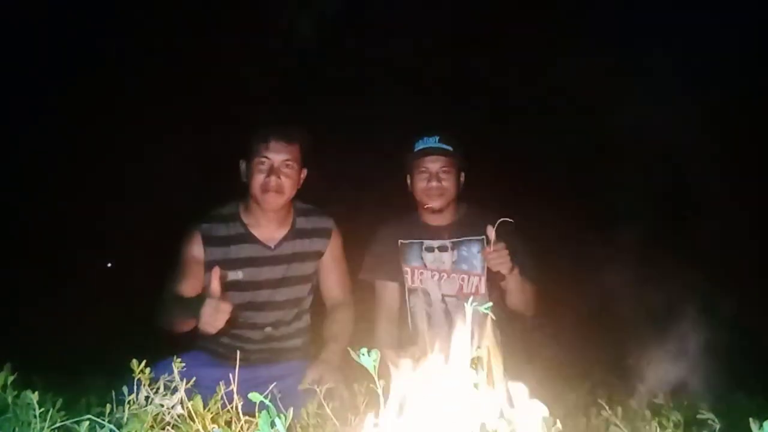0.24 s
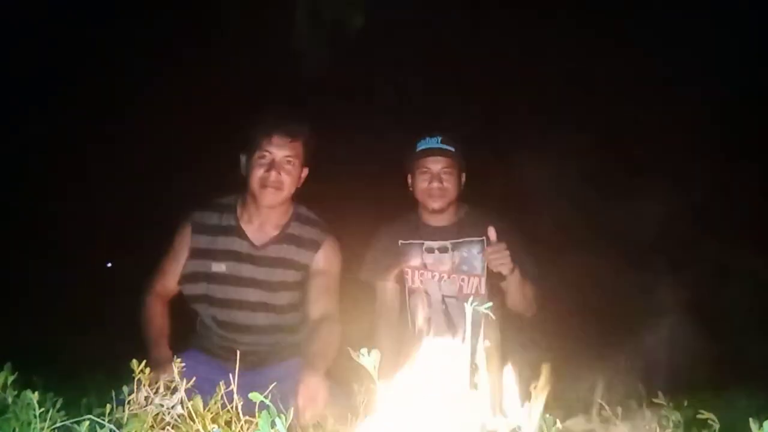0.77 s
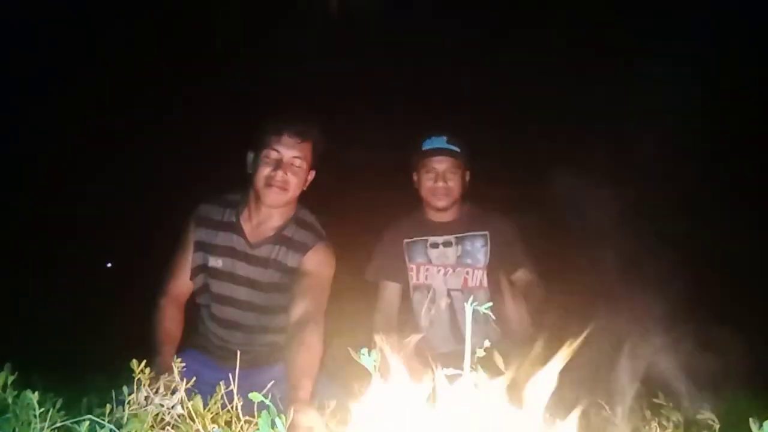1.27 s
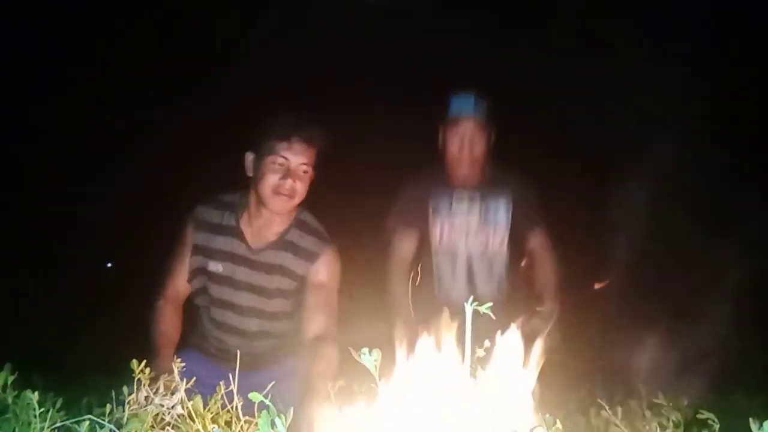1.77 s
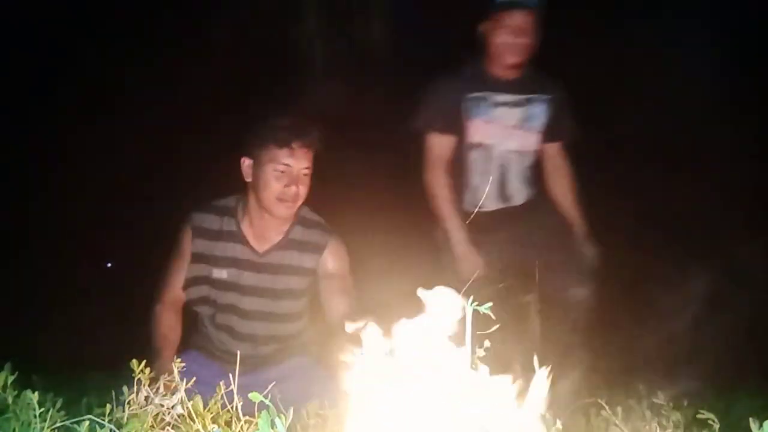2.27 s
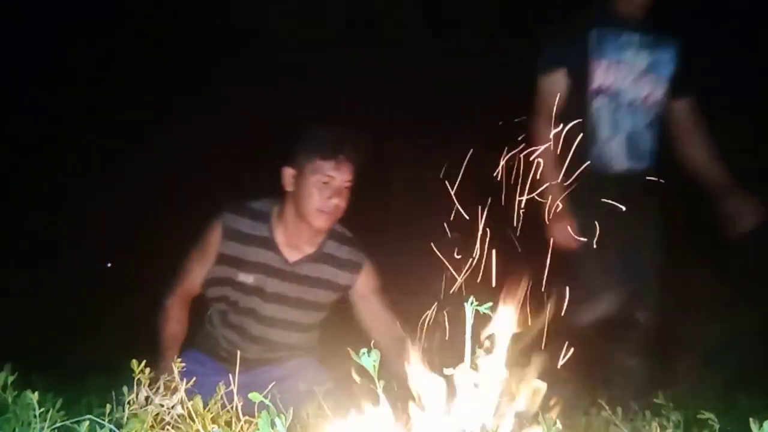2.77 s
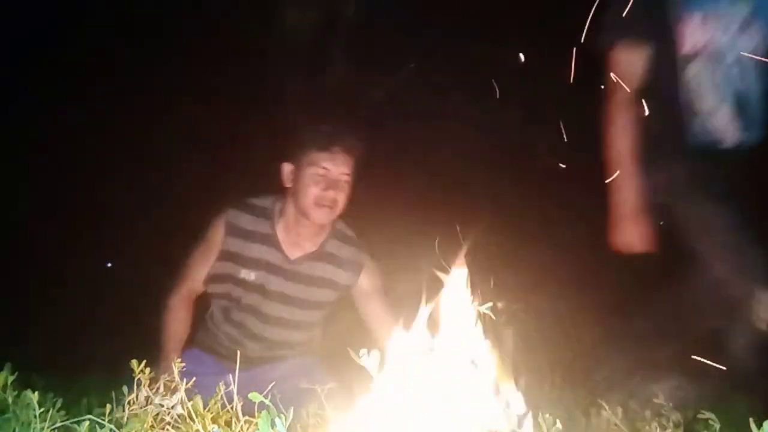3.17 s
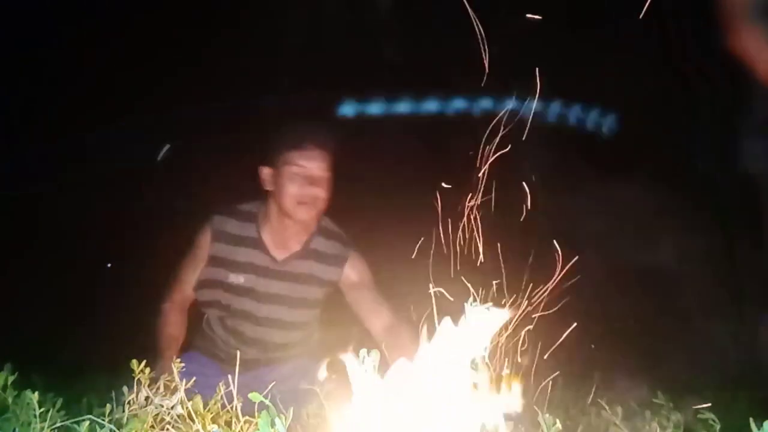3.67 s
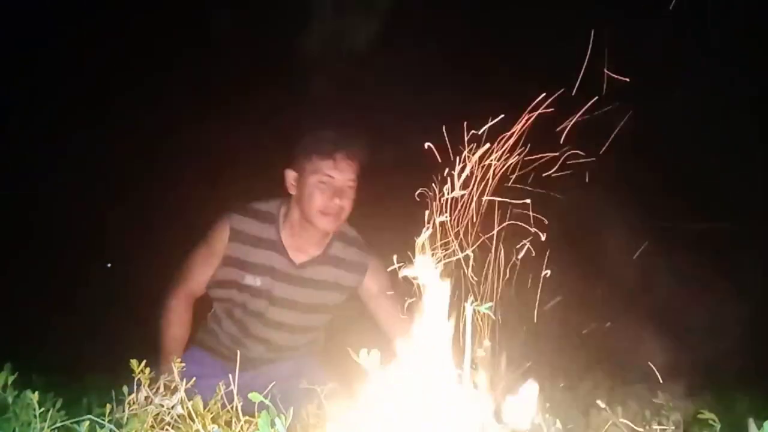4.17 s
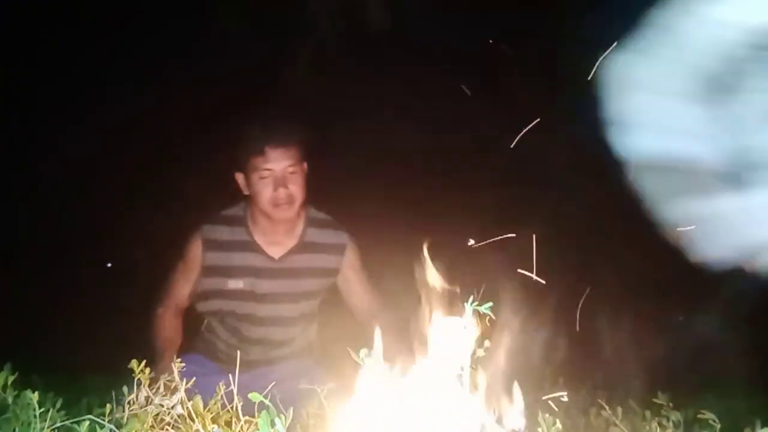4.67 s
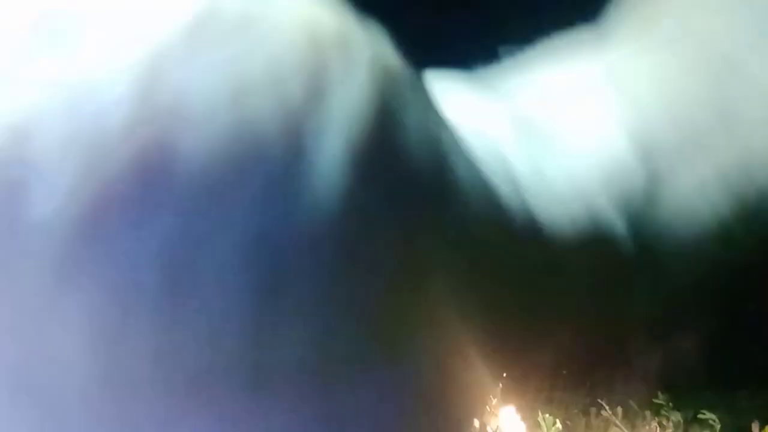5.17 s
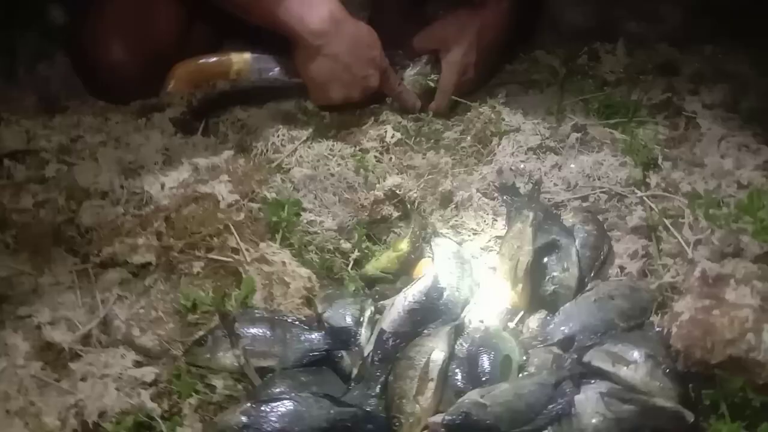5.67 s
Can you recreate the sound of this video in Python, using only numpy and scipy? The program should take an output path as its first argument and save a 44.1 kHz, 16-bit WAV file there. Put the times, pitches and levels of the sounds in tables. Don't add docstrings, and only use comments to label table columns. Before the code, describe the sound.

Close, dry recording in open night air: crickets trill and shimmer in wide stereo, with a faint low flame rumble. Near the middle, a fire spits fine ticks, a few hard gunlike pops, and clusters of crunchy stalk cracks. Grass rustles in bursts after three seconds with soft knocks. A short dropout near the end is followed by a fade-in.

```python
import sys
import numpy as np
from scipy import signal
from scipy.fft import rfft, irfft
from scipy.io import wavfile
from scipy.ndimage import uniform_filter1d

SR = 44100
rng = np.random.default_rng(int(sys.argv[2]) if len(sys.argv) > 2 else 0)


def generate_wav(signal):
    frames = np.transpose(np.atleast_2d(signal))
    scaled = np.clip(frames, -1, 1) * 32767
    pcm = np.round(scaled).astype(np.int16)
    wavfile.write(sys.argv[1], SR, pcm)


def undo_db(level):
    steps = np.asarray(level, float) / 20
    return 10 ** steps


N = 261502
T = np.arange(N) / SR


def evened(x):
    return x / np.sqrt(np.mean(x ** 2) + 1e-20)


def read(points, hz):
    f, value = np.transpose(points)
    return np.interp(np.log(hz + 1), np.log(f + 1), value)


def add(mix, s, sound):
    part = mix[round(s * SR):][:len(sound)]
    part += sound[:len(part)]


def ring(hz, t60, rise):
    t = np.arange(500) / SR
    shape = (1 - np.exp(-t / rise)) * undo_db(-60 * t / t60)
    return np.sin(2 * np.pi * hz * t) * shape / shape.max()


# (frequency [Hz], width [Hz], level [dB])
PORT = [(2490, 110, -9.5), (5100, 2900, 9), (15500, 1400, -7.5)]


def burst():
    burst_s, leak_hz = 0.0003272, 520
    t = np.arange(500) / SR
    drop = (np.tanh((t - 3e-4 - burst_s) / 3e-5) - np.tanh((t - 3e-4) / 3e-5)) / 2
    spikes = signal.lfilter(*signal.butter(1, leak_hz, "high", fs=SR), drop)
    rings = sum(undo_db(db) * signal.lfilter(*signal.iirpeak(hz, hz / width, SR), spikes) for hz, width, db in PORT)
    return (spikes + rings) / abs(spikes + rings).max()


def tick():
    t = (np.arange(200) - 60) / SR
    needle = np.exp(-(t / 3.5e-5) ** 2) * np.sin(2 * np.pi * 10500 * t)
    top = 1.1 * needle + .33 * np.cos(2 * np.pi * 14800 * t) * np.exp(-abs(t) / 3e-4)
    return signal.lfilter(*signal.butter(2, 2500, "high", fs=SR), top)


# (time [s], peak level [dB], top tick level [dB])
POPS = [
    (0.924, -1.5, -19),
    (2.0064, -38, -36),
    (2.011, -10.5, -17),
    (2.0225, -18, -49),
    (3.1164, -3, -22),
    (3.123, -23, -35.5),
    (3.1247, -19.5, -35.5),
]


def sap_pops():
    out, pop, top = np.zeros(N), burst(), tick()
    thud_db, thud_hz, thud_t60_s = -32, 170, .05
    thud = signal.resample_poly(ring(thud_hz * 4, thud_t60_s / 4, 1e-4), 4, 1)
    for s, db, tick_db in POPS:
        add(out, s - 3.5e-4, undo_db(db) * pop)
        add(out, s, undo_db(db + thud_db) * thud)
        add(out, s - 60 / SR, undo_db(tick_db + 3.5) * top)
    return out


# (time [s], top tick level [dB], ring level [dB], thump level [dB])
SPARKS = [(0.5077, -43, -37.5, -78), (0.7126, -36, -51, -69), (.718, -18.5, -30, -57),
          (0.7204, -36, -36, -56), (0.7299, -21, -30, -71), (.731, -57, -49, -70),
          (1.8412, -34.5, -25.5, -57.5), (2.0174, -14.5, -8, -9), (2.3216, -26, -29, -32),
          (2.3269, -24, -46, -26), (2.3291, -40, -15, -31), (2.5586, -35, -63, -73),
          (2.5698, -37, -60, -73), (3.4887, -46, -30.5, -72), (3.865, -36, -38.5, -55),
          (3.8694, -44, -52, -48), (3.8706, -13.5, -20.5, -40.5), (3.8797, -30, -22, -35),
          (3.8786, -29, -9.5, -38), (3.8856, -44, -49, -44.5), (3.8948, -38, -25.5, -58),
          (4.0112, -22.5, -12.5, -40.5), (4.0148, -50, -46, -61), (4.3896, -36, -24, -44),
          (4.4069, -41, -30, -40.5), (4.476, -43, -54, -67), (4.5462, -39.5, -29.5, -51),
          (4.7099, -36, -34, -67), (5.344, -34, -27, -45), (5.615, -27.5, -21, -43.5)]


def sparks():
    tones = 5700 + 210 * rng.standard_normal(len(SPARKS)).clip(-1, 1)
    hz_per_db, length_ms = -51, 0.25
    return [(s, low, db, hz + hz_per_db * (low + 50), top, length_ms)
            for (s, top, db, low), hz in zip(SPARKS, tones)]


# (time [s], ring level [dB], ring frequency [Hz], thump level [dB])
CRUSHES = [(2.0084, -51, 4600, -23), (2.0128, -70, 3600, -46), (2.0156, -47, 4760, -35),
           (2.2551, -29.5, 6200, -55), (3.0722, -43, 5000, -46.5), (3.0753, -36, 4800, -62),
           (3.2037, -12, 6120, -32), (3.7472, -24.5, 5300, -39.5), (3.8806, -95, 6070, -44),
           (3.8825, -84, 5350, -51), (4.1085, -23.5, 5960, -48), (4.3026, -40, 4700, -30),
           (4.305, -10, 5750, -15), (4.3082, -15.5, 5700, -40), (4.3096, -30, 5800, -20.5),
           (4.3113, -9, 6070, -35), (4.3125, -25, 6400, -27.5), (4.3156, -42, 6200, -20),
           (4.3169, -20, 4360, -22), (4.3223, -34, 5230, -29), (4.3253, -21, 5100, -25),
           (4.328, -15, 5350, -29), (4.869, -22, 5400, -48), (4.8705, -22, 5700, -29),
           (4.8733, -37, 4840, -47), (4.9753, -29, 4280, -55), (4.977, -33, 6400, -55),
           (4.9797, -33, 5100, -32), (5.3521, -36, 4690, -47)]


def crushes():
    tick_db, length_ms = -25, 0.65
    return [(s, low, db, hz, db + tick_db, length_ms) for s, db, hz, low in CRUSHES]


# (time [s], ring level [dB], ring frequency [Hz])
SNAPS = [(0.1155, -29, 6300), (1.658, -31.5, 6400), (1.6653, -37, 4840), (1.9526, -35, 5200),
         (2.256, -28, 5800), (2.277, -36, 5100), (2.302, -27.5, 6200), (3.0648, -31.5, 5100),
         (3.0693, -31, 6300), (3.0902, -31.5, 5350), (3.093, -32, 5360), (3.2056, -34, 5000),
         (3.397, -34, 6800), (3.4993, -29.5, 5500), (3.8172, -31, 5550), (4.012, -23, 5570),
         (4.1106, -25, 5750), (4.146, -29, 6000), (4.551, -37.5, 4530), (4.6283, -29.5, 5670),
         (4.6469, -34, 4660), (4.8306, -26.5, 6000), (5.3803, -27.5, 5460), (5.3827, -40, 4340),
         (5.3864, -26, 5000), (5.6152, -27, 5000), (5.6193, -36, 6260)]


def snaps():
    thump_db, tick_db, length_ms = -30, -30, .45
    return [(s, db + thump_db, db, hz, db + tick_db, length_ms) for s, db, hz in SNAPS]


# (time [s], ring level [dB], ring frequency [Hz])
EMBERS = [(0.0833, -34.5, 5240), (0.1644, -32.5, 5940), (0.1695, -43, 4000), (.19, -46, 4230),
          (0.245, -41.5, 4400), (0.735, -36, 5930), (1.607, -34.5, 5600), (1.7796, -38, 6900),
          (2.189, -41, 5250), (2.2202, -38, 6350), (3.033, -35.5, 4000), (3.18, -20, 6300),
          (3.197, -23, 4600), (3.211, -21.5, 6400), (3.421, -31.5, 6600), (3.723, -50, 3200),
          (4.3435, -30, 5210), (5.01, -27.5, 6040), (5.014, -29, 5700), (2.077, -42, 4000),
          (5.1181, -49.5, 5700), (5.873, -47, 3960), (5.9083, -33.5, 5260)]


def embers():
    return [(s, db - 21, db, hz, db - 18, .4) for s, db, hz in EMBERS]


def crunch(hz, length_s, phases):
    t = np.arange(400) / SR
    u = t / (0.28 * length_s)
    modes = np.cos(2 * np.pi * (hz * t + phases[0])) + 0.27 * np.cos(2 * np.pi * (0.738 * hz * t + phases[1]))
    return signal.lfilter(*signal.butter(3, 2400, "high", fs=SR), modes * u ** 2 * np.exp(2 - u) / 4 / 1.19)


def cracks():
    out, top = np.zeros(N), tick()
    thump = signal.lfilter(*signal.butter(2, 2600, fs=SR), burst())
    thump = thump / abs(thump).max()
    hollow = 1.04 * ring(720, 0.0038, 0.00058) + 0.4 * ring(1650, 0.017, 0.00027)
    hollow = hollow + 1.74 * ring(PORT[0][0], 0.0097, 0.00019)
    hollow = signal.lfilter(*signal.butter(1, 110, "high", fs=SR), hollow)
    rows = sparks() + crushes() + snaps() + embers()
    for (s, thump_db, ring_db, hz, tick_db, ms), phases in zip(rows, rng.random((len(rows), 2))):
        soft = np.clip((ring_db - tick_db - 12) / 22, 0, 1)
        add(out, s - 6e-4, undo_db(thump_db - 3.5) * ((1 - soft) * thump + soft * hollow))
        add(out, s - 0.00054 * ms, undo_db(ring_db + 2.5) * crunch(hz, ms / 10 ** 3, phases))
        add(out, s - 60 / SR, undo_db(tick_db + 2.5) * top)
    return out


def fire():
    pops, breaks = sap_pops(), cracks()
    t = np.arange(1800) / SR
    rattle = rng.standard_normal(len(t)) * undo_db(-60 * t / 0.034) * (t > 4e-4)
    ground = rng.standard_normal(len(t)) * undo_db(-60 * t / 0.013)
    rattling = undo_db(-28.5) * signal.oaconvolve(breaks, rattle)[:N]
    echo = undo_db(-43) * signal.oaconvolve(pops, ground)[:N]
    return breaks + rattling + pops + echo


# (time [s], effort level [dB])
STIR = [(0, -82), (.11, -83.5), (1.6, -83), (2.18, -77), (2.28, -60), (2.45, -72.5), (3.02, -72.5),
        (3.17, -48), (3.3, -70), (3.68, -56.5), (3.9, -70.5), (4.23, -57), (4.55, -62), (4.79, -54),
        (5.17, -69), (5.38, -70.5), (5.51, -79.5), (5.93, -68)]


def effort_db():
    times, levels = np.transpose(STIR)
    return np.interp(T, times, levels)


def follow(calm_db, share):
    return undo_db(calm_db + share * (effort_db() + 70))


def spit():
    per_s, spread_db = 29, 4.5
    size = undo_db(spread_db * np.minimum(rng.exponential(1, N), 4)) * (rng.random(N) < per_s / SR)
    return follow(-56.5, .3) * signal.oaconvolve(size, tick())[:N]


# (frequency [Hz], level [dB])
RUSTLE = [(470, -51), (800, -18), (2040, -18), (2440, -10.5), (6460, 5), (8020, -11), (13500, -21.5),
          (15100, -27), (15900, -20), (16500, -71)]


def grass():
    clumps = undo_db(4.0 * evened(uniform_filter1d(rng.standard_normal(N), size=700)))
    clicks = undo_db(4 * np.minimum(rng.exponential(1, N), 4)) * (rng.random(N) < 2200 * clumps / SR)
    stalk, modes = rng.integers(0, 8, N), np.geomspace(1800, 12000, num=8)
    grains = np.zeros(N)
    for k, hz in enumerate(modes):
        mode = ring(hz, 7 / hz, 5e-5) * np.sqrt(hz)
        grains += signal.oaconvolve(clicks * (stalk == k), mode)[:N]
    drive = evened(grains) + .75 * rng.standard_normal(N)
    tone = undo_db(read(RUSTLE, np.fft.rfftfreq(N, 1 / SR)))
    return undo_db(effort_db() + 9) * evened(irfft(rfft(drive) * tone, N))


# (time [s], length [s], frequency [Hz], level [dB])
SCUFFS = [(1.912, 0.092, 443, -61), (1.954, 0.045, 2530, -62.5), (2.41, 0.02, 520, -67.5),
          (2.432, 0.032, 3320, -51.5), (2.47, 0.013, 3440, -57), (2.506, 0.019, 490, -69.5),
          (3.069, 0.014, 1170, -55), (3.442, 0.038, 279, -67.5), (3.534, 0.042, 493, -61.5),
          (3.537, 0.044, 1190, -69), (3.538, 0.035, 2580, -63.5), (3.631, 0.04, 406, -62.5),
          (3.737, 0.028, 443, -54.5), (3.76, 0.05, 837, -64.5), (4.153, 0.18, 513, -61.5),
          (4.544, 0.045, 593, -71), (4.773, 0.064, 360, -56), (4.849, 0.032, 369, -54.5),
          (5.839, 0.035, 560, -64.5), (5.754, 0.089, 653, -76.5), (0.076, 0.055, 475, -70.5),
          (4.966, 0.021, 990, -57.5), (2.01, 0.032, 75.5, -41)]


def scuffs():
    out = np.zeros(N)
    for (s, length_s, hz, db), noise in zip(SCUFFS, rng.standard_normal((len(SCUFFS), 9000))):
        b, a = signal.iirpeak(hz, 2.4 + hz / 1100, SR)
        rub = signal.lfilter(b, a, signal.lfilter(b, a, noise))
        rub = evened(rub)[2000:][:int(length_s * SR)]
        add(out, s, undo_db(db) * rub * signal.windows.tukey(len(rub), .6))
    return out


# (frequency [Hz], side level under middle [dB])
NEAR_WIDTH = [(60, -20.5), (400, -36), (1200, -30), (5000, -42.5), (9000, -33.5), (15000, -12.5)]


def widened(near):
    apart = irfft(1j * rfft(near) * undo_db(read(NEAR_WIDTH, np.fft.rfftfreq(N, 1 / SR))), N)
    return near + np.array([apart, -apart])


# (frequency [Hz], side level under middle [dB])
WIDTH = [(60, -21), (180, -16), (550, -12.5), (1650, -4.5), (4970, -34), (15000, -11.5)]


def hiss(points, patchy_db, size=512):
    hz = np.fft.rfftfreq(size, 1 / SR)
    a, b, c, d, patches = rng.standard_normal((4 * N // size + 5, len(hz), 5)).T
    patches = evened(uniform_filter1d(uniform_filter1d(patches, size=6, axis=0), size=14, axis=1))
    z = np.array([a + 1j * b, (c + 1j * d) * undo_db(read(WIDTH, hz))[:, None]])
    z = z * undo_db(read(points, hz)[:, None] + patchy_db * patches)
    noise = signal.istft(z, nperseg=size, noverlap=3 * size // 4)[1][:, :N]
    mid, side = evened(noise) * np.sqrt(2)
    return np.array([mid + side, mid - side])


# (frequency [Hz], level [dB])
TREAD = [(200, -21.5), (330, -3), (480, 0), (700, -2.5), (1300, -16), (2200, -28.5)]


def footfalls():
    return follow(-83.5, 0.8) * hiss(TREAD, 3.5, size=1024)


# (frequency [Hz], level [dB])
FLAME = [(15, -58), (25, -23.5), (107, 2), (533, -24.5), (810, -32), (900, -35), (1170, -71), (1980, -120)]


def flames():
    return follow(-76, 0.12) * hiss(FLAME, 2.5, size=2048)


def chirps(period_s, first_s, offsets, hz, glide_hz, length_s, spread_db, rough):
    out, t = np.zeros(N), np.arange(0, length_s, 1 / SR)
    starts = np.arange(first_s % period_s, N / SR, period_s)
    for s, (u, v, *sizes) in zip(starts, rng.standard_normal((len(starts), 2 + len(offsets)))):
        turns = (hz + 60 * u) * t + glide_hz * t ** 2 / (2 * length_s)
        stroke = np.sin(2 * np.pi * turns) * np.hanning(len(t))
        for later, size in zip(offsets, sizes):
            add(out, abs(s + later + 0.0016 * v), undo_db(spread_db * size) * stroke)
    teeth = evened(uniform_filter1d(uniform_filter1d(rng.standard_normal(N), size=60), size=40))
    return evened(out * (1 + rough * teeth))


def trill(hz, width, per_s):
    wobble = evened(uniform_filter1d(rng.standard_normal(N), size=2000))
    turns = np.cumsum(per_s * (1 + 0.093 * wobble)) / SR
    clicks = np.diff(np.floor(turns), prepend=0) * undo_db(3 * rng.standard_normal(N))
    clicks = clicks + .04 * rng.standard_normal(N)
    b, a = signal.iirpeak(hz, hz / width, SR)
    return evened(signal.lfilter(b, a, signal.lfilter(b, a, clicks)))


# (frequency [Hz], level [dB])
NIGHT = [(500, -54.5), (750, -40.5), (2050, -34.5), (2400, -16), (2750, -26), (3700, -24), (4850, -2),
         (5800, -6), (6500, -11.5), (7900, -17.5), (8900, -15.5), (9900, -27), (13400, -43), (15200, -22),
         (16400, -47.5)]


def insects():
    falling = chirps(.192, .36, [0, .033, .066, .099, .145], 5150, -550, .022, 3, .35)
    rising = chirps(.0659, .416, [0, .0165], 6700, 650, .01, 2.6, .5)
    buzz = chirps(.2575, .015, np.arange(13) / 117, 5650, -350, .006, 2, .3)
    near = undo_db(-60.5) * falling + undo_db(-65.5) * rising + undo_db(-67) * buzz
    near = near + undo_db(-83.5) * trill(2400, 260, 154)
    growth_db_per_s = 0.31
    return undo_db(-62 + growth_db_per_s * T) * hiss(NIGHT, 1.6) + near


def scene():
    near = fire() + grass() + scuffs() + spit()
    return widened(near) + footfalls() + flames() + insects()


def roll_off(x):
    return signal.sosfilt(signal.butter(12, 16810, fs=SR, output="sos"), x)


def record(dry):
    body = signal.lfilter(*signal.butter(2, 1800, fs=SR), dry.mean(0))
    power_db = 10 * np.log10(abs(uniform_filter1d(body ** 2, size=200)) + 1e-12)
    fall = 98 * T
    over_db = np.maximum(np.maximum.accumulate(power_db + fall) - fall + 39.0, 0)
    release_db, limit_db = 6, 14.
    dip_db = np.minimum(over_db, limit_db) * (over_db > release_db)
    late_db = np.roll(uniform_filter1d(dip_db, size=250), 420)

    cut_s, back_s, fade_s = 5.6705, 5.737, .08
    from_db, to_db = -22.5, 3
    fade_in = undo_db(to_db + (from_db - to_db) * np.exp(-abs(T - back_s) / fade_s))
    fade = np.where(T < cut_s, 1, (T > back_s) * fade_in)
    edge = signal.firwin(127, 16300, window=("kaiser", 8), fs=SR)[None]
    out = signal.oaconvolve(dry * undo_db(-late_db), edge, "same") * fade
    out = out - undo_db(-76)

    below_top = signal.firwin(511, 15620, window=("kaiser", 8), fs=SR)[None]
    top = out - signal.oaconvolve(out, below_top, "same")
    open_db = -58
    loud = uniform_filter1d((top ** 2).mean(0), size=256) > undo_db(2 * open_db)
    out = out - top * (1 - uniform_filter1d(1. * loud, size=128))
    return roll_off(out)


dry = scene()
out = record(dry)
generate_wav(out)
```